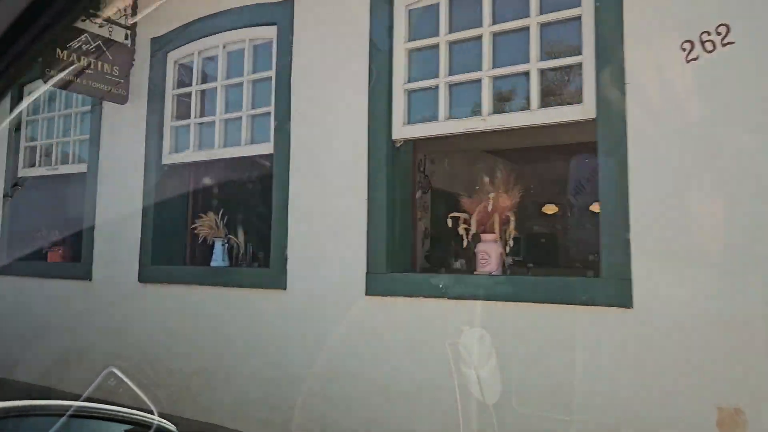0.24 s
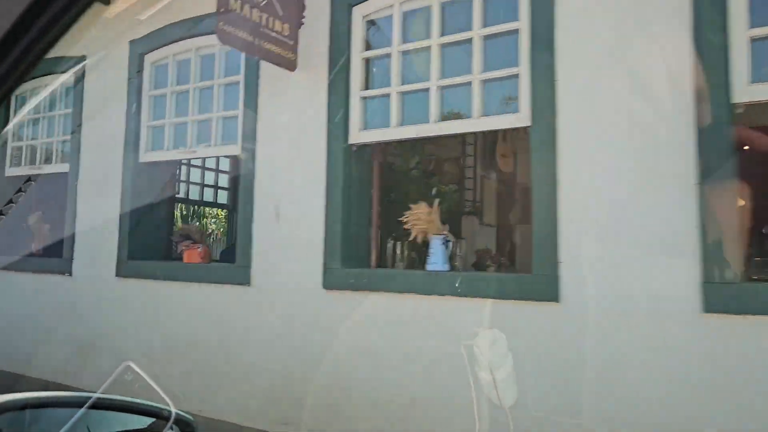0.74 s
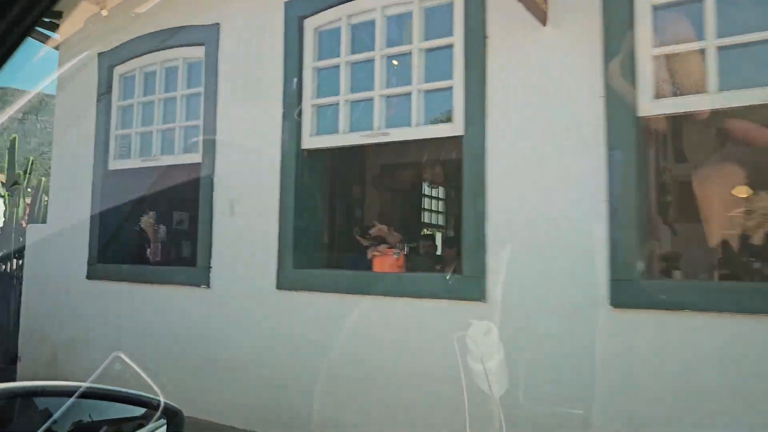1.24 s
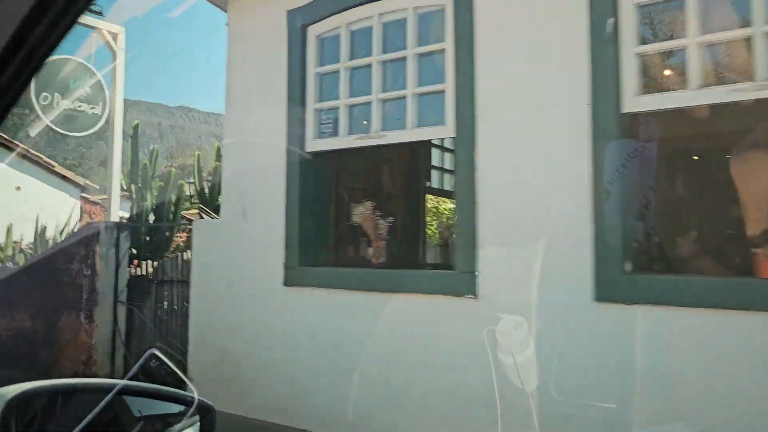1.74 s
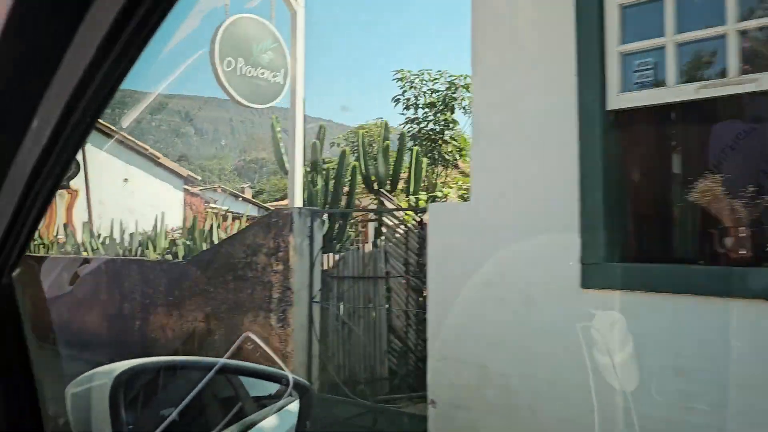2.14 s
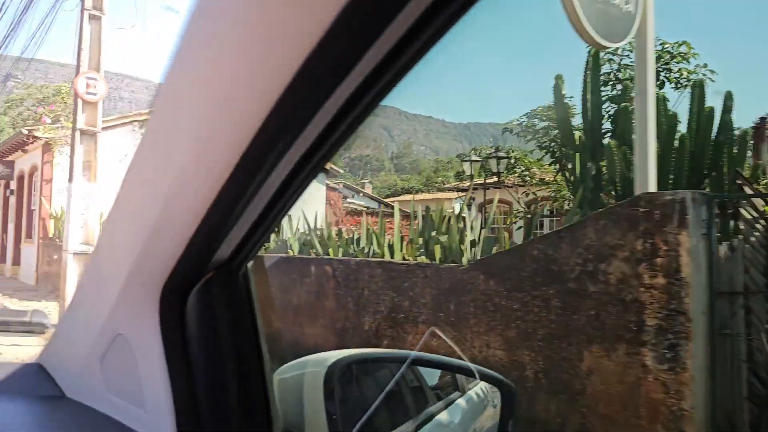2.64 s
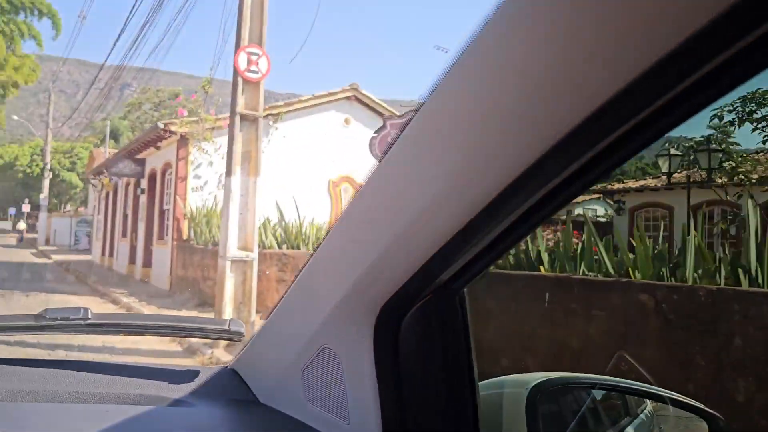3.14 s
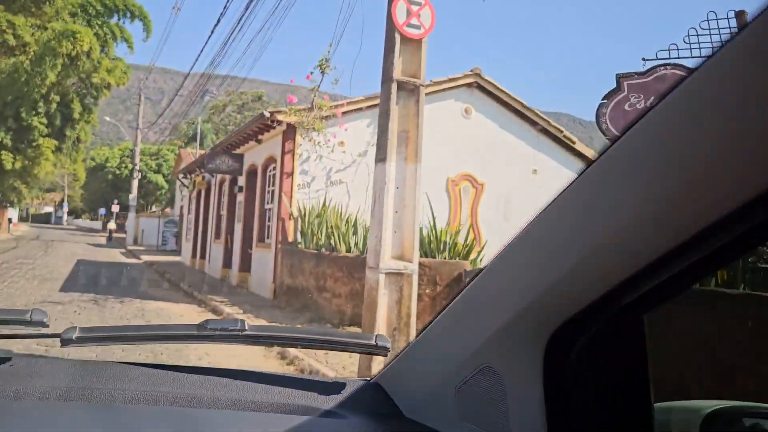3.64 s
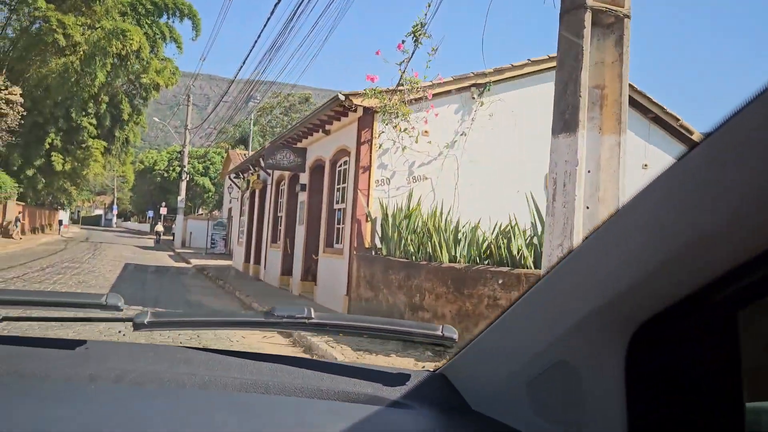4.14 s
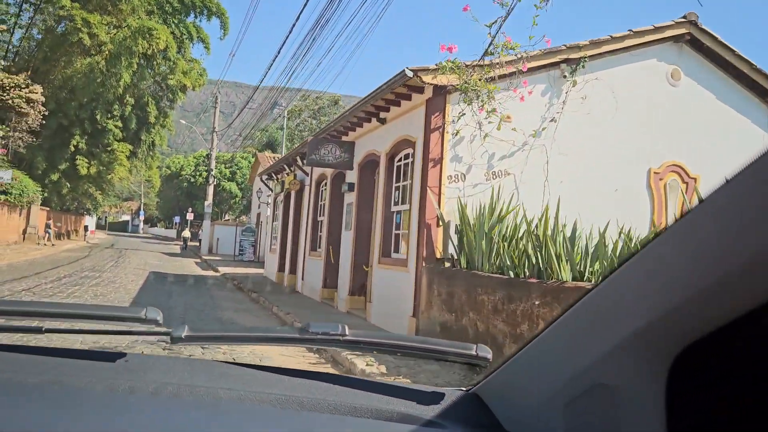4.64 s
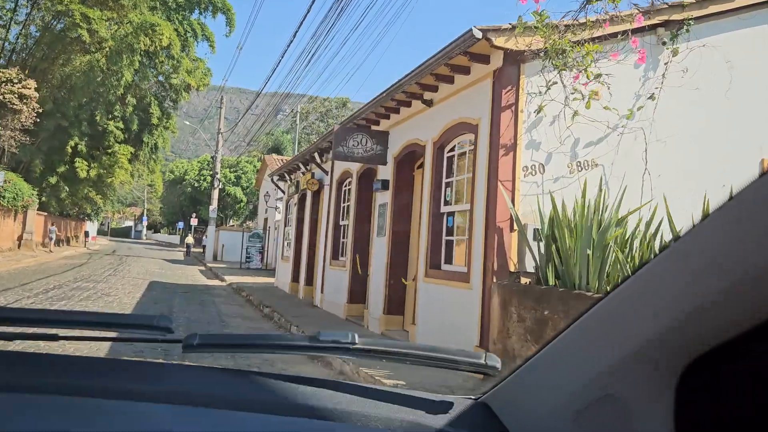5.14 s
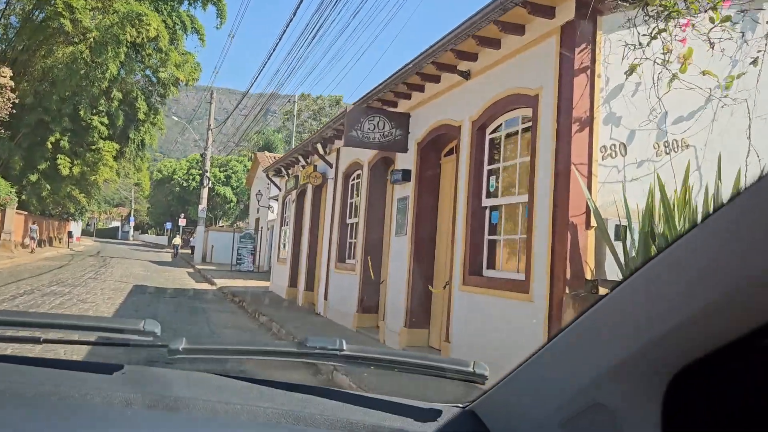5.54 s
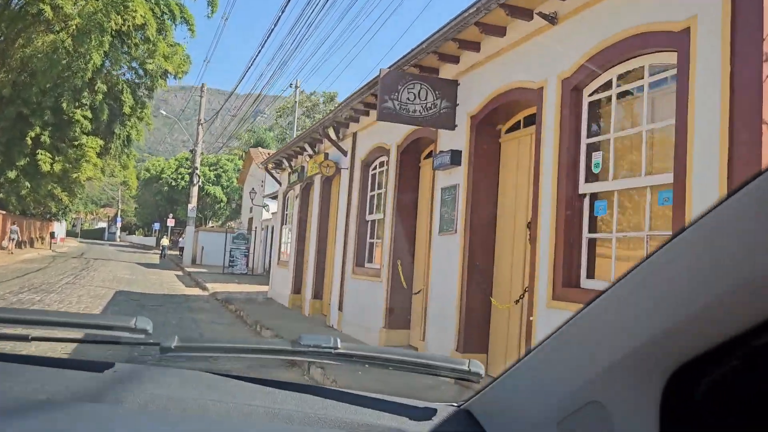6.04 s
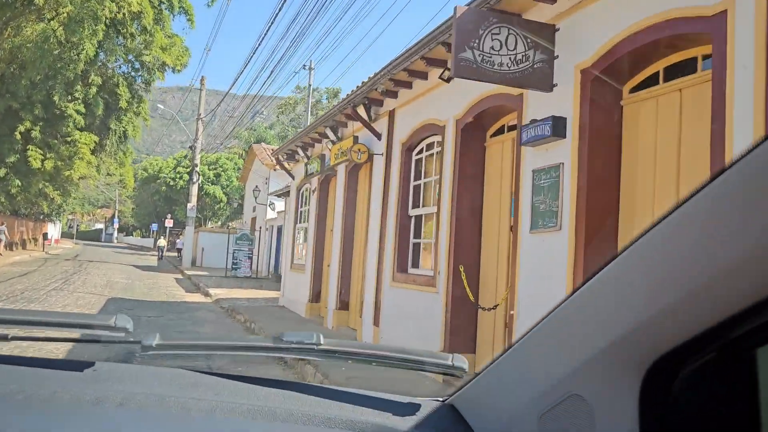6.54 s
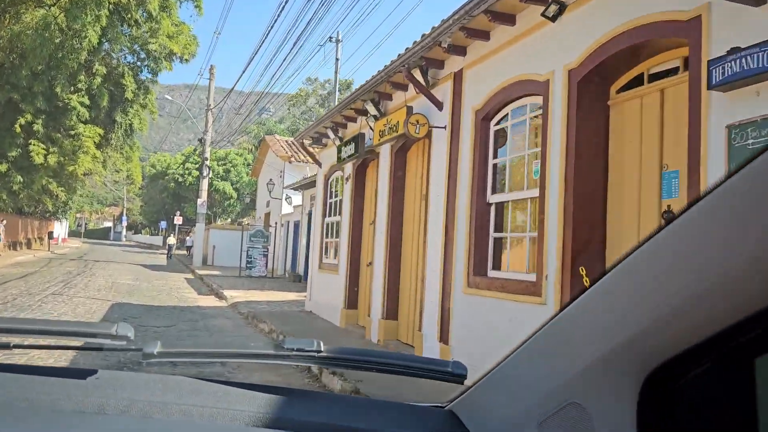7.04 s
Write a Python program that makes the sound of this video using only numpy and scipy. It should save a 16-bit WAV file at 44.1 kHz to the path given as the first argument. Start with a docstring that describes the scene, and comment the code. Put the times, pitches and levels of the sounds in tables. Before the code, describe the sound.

Heard from the front seat with windows shut, a car rolls at walking pace over cobbles. A deep, lumpy rumble and boxy drumming dominate throughout, broken by irregular soft thumps and dull suspension clunks. Above it, loose plastic trim ticks, rubs and knocks in small dry clusters, with rare tiny metal pings. Faint ventilation hiss sits far behind. Bumps crowd together more in the later half.

```python
"""Car on rough cobbles

A car rolls at walking pace over rough cobbles, heard from the front seat with the windows shut.
Random kicks from the stones ring the body, the cabin air and the tyres; scrubbing noise is the tread.
Proud stones thump, and suspension joints clunk. Loose trim ticks, rubs and knocks in noise bursts,
small metal parts ping as dying tones, and filtered noise makes the faint hiss of the ventilation."""
import sys
import numpy as np
from scipy import signal
from scipy.fft import rfft, irfft, next_fast_len
from scipy.io import wavfile
from scipy.ndimage import uniform_filter1d, minimum_filter1d

SR = 44100
rng = np.random.default_rng(int(sys.argv[2]) if len(sys.argv) > 2 else 0)


def int16_out(signal):
    """Quantize to a 16-bit WAV file."""
    q = np.round(np.clip(np.atleast_2d(signal).T, -1, 1) * 32767)
    wavfile.write(sys.argv[1], SR, q.astype(np.int16))


N = 320996
TIME = np.arange(N) / SR


def from_db(db):
    """Turn decibels into a gain."""
    return 10 ** (np.asarray(db) / 20)


def rms_one(x):
    """Scale a sound to an average strength (rms) of 1."""
    return x / np.sqrt(np.mean(x ** 2) + 1e-20)


def in_time(rows):
    """Draw each column of a (time, values) table as a curve over every sample."""
    s, *columns = np.transpose(rows)
    return np.array([np.interp(TIME, s, column) for column in columns])


def at_hz(points, hz):
    """Read a (pitch, value) curve between its points, on a log-frequency axis."""
    point_hz, value = np.transpose(points)
    return np.interp(np.log(hz + 1), np.log(point_hz), value)


def drift(rate):
    """Wander at random between new values, `rate` of them a second, with an rms of 1."""
    knots = rng.standard_normal(int(N / SR * rate) + 3)
    return rms_one(np.interp(TIME * rate, np.arange(len(knots)), knots))


def steady(x, span):
    """Even out the swells that are slower than span seconds."""
    power = np.mean(np.atleast_2d(x) ** 2, axis=0)
    power = uniform_filter1d(power, int(span * SR))
    power = uniform_filter1d(power, int(span * SR / 2))
    return x / np.sqrt(power + 1e-20)


def colour(x, spectrum):
    """Filter to the given spectrum without pre-echo, falling away below its first point."""
    size = next_fast_len(N + SR // 10, True) // 2 * 2
    hz = np.fft.rfftfreq(size, 1 / SR)
    bass_fall = 2 * np.log(np.minimum((hz + 10) / spectrum[0][0], 1))
    log_gain = np.log(from_db(at_hz(spectrum, hz))) + bass_fall
    # folding the cepstrum makes the filter minimum-phase: it answers as early as it can
    cepstrum = irfft(log_gain)
    cepstrum[1:size // 2] *= 2
    cepstrum[size // 2 + 1:] = 0
    return irfft(rfft(x, size) * np.exp(rfft(cepstrum)), size)[..., :N]


def resonate(x, modes):
    """Ring several resonances side by side, with alternating sign."""
    out = 0
    for k, (hz, width, db) in enumerate(modes):
        r = np.exp(-np.pi * width / SR)   # a narrow resonance rings longer
        b = np.array([1, 0, -1]) * (1 - r * r) / 2
        a = [1, -2 * r * np.cos(2 * np.pi * hz / SR), r * r]
        out = out + (-1) ** k * from_db(db) * signal.lfilter(b, a, x + 1e-18)
    return out


def band(x, low_hz, high_hz, order=4):
    """Keep only the sound between two pitches."""
    return signal.sosfilt(signal.butter(order, [low_hz, high_hz], "band", fs=SR, output="sos"), x)


# how alike left and right are, from 1 (the same) through 0 (unrelated) to -1 (opposite)
# columns: pitch_hz, likeness
LEFT_RIGHT_LIKENESS = [(30, .999), (65, .998), (130, .99), (200, .95), (290, .83), (640, .62), (1410, -.08),
                       (3100, .03), (15000, .1)]


def two_ears(a, b):
    """Mix two unrelated signals into cabin stereo: alike in the bass, unrelated in the treble."""
    size = next_fast_len(N, True)
    alike = np.clip(at_hz(LEFT_RIGHT_LIKENESS, np.fft.rfftfreq(size, 1 / SR)), -.999, .999)
    mid = irfft(rfft(a, size) * np.sqrt(1 + alike), size)
    side = irfft(rfft(b, size) * np.sqrt(1 - alike), size)
    return np.array([mid + side, mid - side])[:, :N]


def pan(db):
    """Give the gains that make left louder than right by db."""
    return from_db(np.array([[db], [-db]]) / 2)


def add(out, s, sound):
    """Mix a sound in at s seconds."""
    at = max(int(s * SR), 0)
    out[..., at:at + sound.shape[-1]] += sound[..., :max(N - at, 0)]


def contacts(per_s, spread_db):
    """Scatter random pushes of uneven strength and either direction."""
    hits = rng.random(N) < per_s / SR
    strength = from_db(spread_db * np.clip(rng.standard_normal(N), -2, 2))
    return hits * strength * rng.choice([-1, 1], N)


def left_first_noise(size, direct):
    """Mix unrelated reflections with a direct part that reaches the right side later; rms 1."""
    lag_s = .00047
    shared = rng.standard_normal(size)
    direct_part = direct * np.array([shared, np.roll(shared, int(lag_s * SR))])
    return rms_one(rng.standard_normal((2, size)) + direct_part)


def crackle(per_s):
    """Clump tiny touches, each a short snap with a wisp of cabin echo, at an even strength."""
    touches = contacts(per_s * from_db(3 * drift(25)), spread_db=3.5)
    t = TIME[:SR // 20]
    echo = np.exp(-t / .0012) + .25 * np.exp(-t / .012)
    energy = np.abs(signal.fftconvolve(touches ** 2, echo ** 2)[:N])
    return steady(np.sqrt(energy) * left_first_noise(N, direct=.6), span=.06)


# colour of the air hiss; columns: pitch_hz, relative_db (per Hz)
VENT_SPECTRUM = [(500, -3.5), (1300, 5.5), (1750, -2.5), (2300, 4), (3100, -2), (3600, -2), (4600, -2.5),
                 (5500, -7.5), (6600, -13.5), (7500, -15), (9000, -13.5), (10500, -28.5), (15000, -23)]
# air whistling past the vent slats; columns: pitch_hz, width_hz, relative_db
SLAT_WHISTLES = [(4908, 28, -1), (3020, 160, -5), (7400, 240, -14)]


def ventilation():
    """Hiss smoothly as air leaves the vents; faint slat whistles come and go, each on its own."""
    hiss = rms_one(colour(two_ears(*rng.standard_normal((2, N))), VENT_SPECTRUM))
    whistles = 0
    for mode in SLAT_WHISTLES:
        flutter_db = 2.8 * np.minimum(drift(12), 1)
        whistles = whistles + resonate(rng.standard_normal((2, N)), [mode]) * from_db(flutter_db)
    whistles = rms_one(band(whistles, 2000, 9800))
    return (from_db(-65) * hiss + from_db(-72) * whistles) * pan(-9.0)


# small metal parts ping; columns: start_s, level_db, pitch_hz, fade_s (time to fall by 60 dB)
METAL_PINGS = [(0.193, -56, 7200, 0.13), (0.196, -63, 7540, 0.79), (0.585, -62.5, 3710, 0.75),
               (1.346, -67, 7500, 0.4), (2.080, -68, 11750, 0.12), (2.334, -49, 4330, 0.035),
               (2.514, -49, 4330, 0.027), (2.958, -70, 12100, 0.13), (3.251, -54, 4380, .04),
               (5.108, -67.5, 7560, 0.25)]


def metal_pings():
    """Ring thin metal as dying tones, made rough by buzzing against its mount."""
    out, t = np.zeros(N), TIME[:SR // 2]
    for s, db, hz, fade_s in METAL_PINGS:
        # higher modes are disturbed more by the buzzing contact
        wobble = 1.6 * (hz / 7400) ** 2 * drift(550)[:len(t)]
        add(out, s, from_db(db - 60 * t / fade_s) * np.sin(2 * np.pi * hz * t + wobble))
    return out


def seal_squeak():
    """Slide one short tone upward, as a rubbing seal squeaks."""
    start_s, length_s, level_db = 4.95, .06, -65.5
    out = np.zeros(N)
    hz = np.linspace(4830, 5320, int(length_s * SR))
    tone = np.sin(2 * np.pi * np.cumsum(hz) / SR)
    add(out, start_s, from_db(level_db) * signal.windows.tukey(len(hz), .8) * tone)
    return out


# loudness of a faint whistle, silent outside these times; columns: time_s, level_db
FAINT_WHISTLE = [(.94, -79), (1.0, -76), (1.09, -69), (1.18, -65.5), (1.26, -71), (1.3, -80), (1.35, -71),
                 (1.41, -72), (1.49, -65.5), (1.55, -70), (1.7, -74.5), (1.82, -93)]


def faint_whistle():
    """Hold one pitch while its loudness rises and falls."""
    level_db = np.interp(TIME, *np.transpose(FAINT_WHISTLE), left=-np.inf, right=-np.inf)
    return from_db(level_db) * np.sin(2 * np.pi * 2003 * TIME)


def pings_and_squeaks():
    """Let the strength of all the thin tones waver, separately on the left and right."""
    waver = 1 + 0.18 * np.array([drift(150), drift(150)])
    return (metal_pings() + seal_squeak() + faint_whistle()) * waver * pan(-2.5)


# panels knock in their clips; columns: start_s, relative_db, pitch_hz
PANEL_KNOCKS = [(0.479, -53.5, 1306), (0.533, -57.5, 1336), (0.722, -58, 1330), (0.796, -51, 1035),
                (0.801, -58, 2100), (0.957, -50, 1320), (0.959, -55, 2270), (1.322, -60, 1310),
                (1.502, -56, 1376), (2.265, -56, 1137), (2.372, -56, 850), (2.374, -60, 1310),
                (2.593, -63, 2120), (2.603, -59, 1340), (2.74, -63, 1440), (2.856, -55.5, 1250),
                (2.854, -55, 2210), (2.886, -58.5, 2140), (2.949, -63, 2230), (3.046, -53.5, 940),
                (3.043, -62, 2220), (3.113, -57.5, 2160), (3.276, -55, 920), (3.506, -61, 1120),
                (3.766, -59, 814), (4.112, -51.5, 777), (4.591, -67, 800), (4.928, -48, 797),
                (4.929, -54, 990), (5.052, -54.5, 818), (5.460, -53, 782), (6.218, -51.5, 984),
                (6.314, -58, 2180), (6.84, -56, 910), (7.170, -58, 1040)]
# ways a panel rings; columns: times_its_pitch, relative_db
PANEL_RINGS = [(1, 0), (1.09, -6), (1.72, -14), (1.95, -17)]


def knocks():
    """Ring a softly bumped panel at its hollow pitch, with a little noisy chatter as it dies."""
    out, t = np.zeros((2, N)), TIME[:SR // 8]
    onset = 1 - np.exp(-t / .0015)
    for s, db, hz in PANEL_KNOCKS:
        ring = 0
        for ratio, mode_db in PANEL_RINGS:
            phase = rng.normal(0, 0.11, (2, 1))   # slightly different left and right
            ring = ring + from_db(mode_db) * np.sin(2 * np.pi * hz * ratio * t + phase)
        buzz = 0.41 * rms_one(band(rng.standard_normal((2, len(t))), hz * .7, hz * 1.5, order=2))
        fade_s = 0.06 * np.sqrt(1200 / hz)   # time to fall by 60 dB: higher knocks die sooner
        add(out, s, from_db(db + 8.5 - 60 * t / fade_s) * onset * (ring + buzz))
    return out


# colour of the creaking trim; columns: pitch_hz, relative_db (per Hz)
CREAK_SPECTRUM = [(700, -10), (1350, -3.5), (1750, 4), (2300, 3.5), (3000, 0), (3600, -3.5), (5000, -4),
                  (6500, -9), (8200, -7), (10300, -19.5), (12300, -11.5), (15000, -19.5)]
# trim rubs and rattles for a moment; columns: middle_s, length_s, level_db, centre_hz
TRIM_RUBS = [(0.033, 0.019, -49, 2800), (0.241, 0.08, -60, 5500), (0.544, 0.023, -61, 2200),
             (0.764, 0.084, -58, 4000), (0.807, 0.051, -62, 3500), (1.49, 0.25, -64.5, 4150),
             (1.903, 0.068, -58, 5500), (2.037, 0.042, -56, 3800), (2.375, 0.044, -61, 3820),
             (2.666, 0.037, -59.5, 4800), (2.87, 0.11, -66, 2300), (3.21, 0.029, -63, 5000),
             (3.258, 0.084, -59, 4500), (3.687, .05, -64, 5000), (3.967, 0.083, -60, 5400),
             (4.107, 0.055, -62, 4500), (4.418, 0.065, -58, 4400), (5.285, 0.098, -65, 5030),
             (5.672, 0.075, -61, 2400), (5.78, 0.088, -62, 5150), (5.959, 0.04, -58.5, 4200),
             (6.063, 0.29, -63.5, 2720), (6.07, 0.089, -61.5, 3570), (6.22, 0.14, -63.5, 2300),
             (6.574, 0.049, -64, 4500), (6.72, 0.19, -62, 3970)]


def trim_rubs():
    """Thicken the crackle into a short rattle where two panels rub."""
    out = np.zeros((2, N))
    slips = colour(crackle(per_s=430), CREAK_SPECTRUM)
    for s, length, db, hz in TRIM_RUBS:
        window = np.sqrt(np.hanning(int(length * SR)))
        at = max(int((s - length / 2) * SR), 0)
        rub = rms_one(band(slips[:, at:at + len(window)], hz / 1.4, hz * 1.6, order=2))
        add(out, s - length / 2, from_db(db) * window * rub)
    return out * pan(-7.0)


# colour of the snapping trim; columns: pitch_hz, relative_db (per Hz)
TRIM_SPECTRUM = [(500, -17.5), (1200, 1), (1900, -4.5), (2900, 4.5), (3500, 1.5), (5200, 7), (6800, 0.5),
                 (8400, 1), (9600, -11.5), (10900, -18.5), (16000, -35)]


def trim_shiver(roar_db):
    """Crackle finely in the door trim, with soft stray ticks, livelier where the road roars more."""
    shake = from_db(0.98 * uniform_filter1d(roar_db - np.median(roar_db), SR // 10))
    fine = rms_one(colour(crackle(per_s=330), CREAK_SPECTRUM))
    fine = from_db(-67) * shake * fine * pan(0.5)
    strays = contacts(per_s=16 * shake, spread_db=2)
    t = TIME[:SR // 30]
    snap = np.exp(-t / .003) * (1 - np.exp(-t / .0008))
    rattle = np.abs(signal.fftconvolve(np.abs(strays), snap)[:N]) * left_first_noise(N, direct=0.3)
    rattle = band(colour(rattle, TRIM_SPECTRUM), 1500, 9000, order=2)
    return fine + from_db(-58) * rattle * pan(-2.5)


# loose trim ticks; columns: start_s, relative_db, left_minus_right_db, sparkle_db (relative)
TRIM_TICKS = [(0.0347, -36.5, -7, -33), (0.0735, -44, -1, -43), (0.1587, -44, -5, -43),
              (0.2326, -40, -1, -27), (0.269, -40.5, -4, -34), (0.392, -46.5, -3.5, -40),
              (.596, -46, -2, -23), (.619, -51, -2, -32), (.68, -51, -5, -38), (0.7297, -46, -1, -24),
              (0.7477, -38.5, 0, -15), (0.7644, -37, 0, -24), (0.7973, -35.5, -2.0, -24),
              (1.196, -44.5, 1, -32), (1.45, -44.5, 0, -32), (1.479, -47, -3.0, -27),
              (1.5075, -40.5, -1.5, -30), (1.5429, -50, -2.0, -35), (1.6062, -51, 7, -32),
              (1.6871, -43, 1, -38), (1.7794, -45.5, 1, -20), (1.793, -47, -2, -15), (1.823, -48, 2, -16),
              (1.857, -53, -1, -30), (1.881, -45, -1, -26), (1.9031, -38, -1, -13), (1.941, -47, 0, -32),
              (1.9784, -42, -4, -31), (2.0365, -48, -3, -27), (2.0534, -42, 1, -16), (2.2623, -41, -3, -17),
              (2.306, -49, -5, -28), (2.3332, -41, -5, -10), (2.3705, -51, 0, -25), (2.385, -43.5, -5, -13),
              (2.4708, -47, -7, -32), (2.4922, -41, -7.5, -37), (2.5127, -44, -7, -17),
              (2.6482, -44, -6, -28), (2.657, -41, -5, -30), (2.6725, -43, -5, -38),
              (2.8499, -46.5, -4.5, -14), (2.9126, -47.5, -3, -22), (3.0674, -50, -5.5, -18),
              (3.094, -46, -6.5, -33), (3.1857, -46.5, -10, -29), (3.2, -49, -5, -28),
              (3.227, -46, -3.0, -15), (3.249, -42.5, -6, -8), (3.2997, -40, -5, -24),
              (3.3154, -42, -4, -15), (3.335, -41, -2, -21), (3.363, -47, -2, -25),
              (3.696, -45.5, -6.0, -33), (3.7219, -45, -4, -28), (3.785, -49, -8, -15),
              (3.831, -54, -2, -33), (3.9469, -52, -2, -22), (3.9624, -41, -3, -16), (4.045, -52, -5, -29),
              (4.0784, -41, -3, -19), (4.1004, -52, -4, -27), (4.1335, -49, -4, -25),
              (4.4089, -50, -4, -25), (4.427, -53, -2, -32), (4.4508, -43.5, -3, -33),
              (4.4805, -46, -2, -29), (4.5146, -44, -4, -26), (4.5517, -43, 0, -21), (4.581, -47, -6, -29),
              (4.5974, -49, -7, -18), (4.6844, -40.5, -4, -34), (4.709, -51, -7, -31),
              (4.8219, -43, -2, -33), (4.8826, -42.5, -3.0, -31), (4.915, -44.5, -6, -28),
              (5.2418, -46, -4.5, -22), (5.284, -43, -3, -22), (5.3066, -44.5, -13, -31),
              (5.544, -50.5, -7, -18), (5.6555, -49, -3, -35), (5.7352, -39.5, -6, -21),
              (5.746, -47, -4, -28), (5.784, -50, -8, -29), (5.805, -45, -3, -16), (5.943, -41.5, -5, -18),
              (6.0212, -41.5, -8.5, -20), (6.0874, -49, -7, -24), (6.112, -46, -4, -26),
              (6.154, -47, -11, -22), (6.1775, -39.5, -5, -25), (6.2318, -37.5, -4, -19),
              (6.2716, -51, -6, -26), (6.34, -57, -8, -34), (6.4802, -43, -7, -34),
              (6.5098, -45, -7.5, -33), (6.54, -55, -8, -32), (6.6077, -38.5, -5.5, -26),
              (6.6308, -47, -10, -29), (6.69, -44, -5.5, -27), (6.7103, -38, -4, -21),
              (6.7345, -39, -4, -10), (6.768, -50, -5.0, -29), (6.79, -47.5, -7, -29),
              (7.0367, -49, -6, -29), (7.059, -49, -5, -23.5), (7.19, -49, -4, -31), (7.206, -49, -4, -32)]
# colour of the top sparkle; columns: pitch_hz, relative_db (per Hz)
SPARKLE_SPECTRUM = [(9500, -33.5), (11000, -19.5), (12200, 1), (13200, -5.5), (14200, -12.5), (16000, -24)]


def trim_ticks():
    """Snap plastic edges in brief noise, with a top sparkle and an answer from the small cabin."""
    snaps, sparkles, t = np.zeros((2, N)), np.zeros((2, N)), TIME[:SR // 8]
    onset = 1 - np.exp(-t / .002)
    # each fade time is the time to fall by 60 dB
    cabin = from_db(-19 - 60 * t / .085)
    crack = (from_db(-60 * t / .014) + cabin) * onset
    shine = (from_db(-60 * t / .026) + cabin) * onset
    for s, db, side_db, top_db in TRIM_TICKS:
        chatter = from_db(db + 3) * pan(side_db) * left_first_noise(len(t), direct=0.2)
        # every piece has a resonance of its own
        piece = resonate(crack * chatter, [(rng.uniform(2200, 7500), 900, 0)])
        snap = from_db(-2.5) * (crack * chatter + piece)
        add(snaps, s, snap)
        # the loose piece touches once more
        add(snaps, s + rng.uniform(.006, .022), from_db(-10) * snap)
        add(sparkles, s, from_db(top_db + 10) * shine * chatter)
    return colour(snaps, TRIM_SPECTRUM) + colour(sparkles, SPARKLE_SPECTRUM)


# a suspension joint clunks on a hard stone; columns: start_s, relative_db, centre_hz
JOINT_CLUNKS = [(0.087, -30.5, 354), (0.715, -35, 344), (1.142, -39.5, 358), (2.286, -38, 363),
                (2.337, -34.5, 348), (2.883, -40, 400), (2.952, -37, 340), (3.042, -35, 327),
                (3.762, -36, 357), (3.89, -37, 353), (4.375, -40, 380), (4.556, -30.5, 360),
                (4.72, -37.5, 403), (4.943, -39.5, 400), (5.088, -36, 380), (5.949, -34, 364),
                (6.103, -36.5, 366), (7.042, -41, 342)]


def clunks():
    """Make a short, dull clunk of narrow noise as a rubber bush takes up its play."""
    out, t = np.zeros(N), TIME[:SR // 8]
    onset = 1 - np.exp(-t / .002)
    fade_s = 0.083   # time to fall by 60 dB
    for s, db, hz in JOINT_CLUNKS:
        ring = rms_one(band(rng.standard_normal(len(t)), hz / 1.1, hz * 1.1, order=2))
        add(out, s, from_db(db + 1.5 - 60 * t / fade_s) * onset * ring)
    return out


# a tyre drops off a proud stone; columns: start_s, cabin_thud_peak_db, tyre_ring_peak_db
STONE_BUMPS = [(.086, -12, -19.5), (.376, -24, -28), (0.443, -19, -33), (.495, -17.5, -33),
               (0.538, -34, -29.5), (.629, -24, -31), (.659, -24, -24), (0.695, -17, -36),
               (0.726, -22.5, -27.5), (0.777, -34, -28), (0.907, -26, -29.5), (.952, -16.5, -44),
               (1.098, -19.5, -24.5), (1.261, -15.5, -35), (1.296, -26, -23), (1.321, -32, -24.5),
               (1.481, -19.5, -44), (2.035, -25, -27.5), (2.105, -12, -38), (2.333, -18, -28),
               (2.353, -29, -28), (2.476, -21.5, -33), (2.626, -16.5, -33), (2.781, -19, -45),
               (2.826, -17, -40), (2.909, -14, -27), (2.952, -13, -29), (2.984, -29, -27),
               (3.009, -33, -24), (3.055, -18.5, -18.5), (3.132, -28.5, -23.5), (3.197, -26.5, -25.5),
               (3.227, -25.5, -23), (3.388, -20, -35), (3.42, -18.5, -39.5), (3.496, -20.5, -28.5),
               (3.848, -14, -34), (3.888, -27, -29), (3.935, -26.5, -32.5), (3.995, -18.5, -45),
               (4.102, -17, -35), (4.469, -31, -26.5), (4.536, -16, -28), (4.555, -13, -44),
               (4.594, -15, -34), (4.673, -27, -30), (4.854, -21, -34), (4.930, -10, -16.5),
               (4.973, -20, -18), (5.022, -14, -31.5), (5.242, -13, -29), (5.279, -14, -30),
               (5.333, -24, -26.5), (5.422, -17, -23), (5.462, -33, -29), (5.491, -23, -28.5),
               (5.755, -16, -21), (5.79, -19.5, -28), (5.945, -14.5, -31), (5.988, -15, -21.5),
               (6.1, -19, -41), (6.146, -22, -26), (6.177, -19, -17), (6.218, -12.5, -17.5),
               (6.257, -19, -18), (6.331, -21.5, -22), (6.372, -15.5, -20.5), (6.418, -25, -30.5),
               (6.601, -24.5, -21), (6.72, -23, -34), (7.001, -17, -23), (7.046, -12.5, -24),
               (7.083, -31, -24.5)]
# cabin resonances, before a random shift; columns: pitch_hz, width_hz, relative_db
CABIN_THUD = [(87.7, 15, -1), (121.6, 24.3, 0.5), (148.9, 21.4, -1.5)]
# tyre resonances, before a random shift; columns: pitch_hz, width_hz, relative_db
TYRE_RING = [(191.7, 23.2, -1), (231.4, 23, -1), (287, 28, -22), (338, 64, -32), (530, 28, -32.5),
             (830, 16, -28.5)]


def soft_push(soft_hz):
    """Round off one sharp push, as rubber or a spring does; a lower soft_hz is softer."""
    smooth = signal.butter(3, soft_hz, fs=SR, output="sos")
    return signal.sosfilt(smooth, signal.unit_impulse(SR // 3))


def bumps():
    """Push once per proud stone: the tyre rings and the cabin thuds through the softer springs."""
    out = np.zeros(N)
    through_springs, through_rubber = soft_push(190), soft_push(480)
    for s, cabin_db, tyre_db in STONE_BUMPS:
        parts = ((through_springs, cabin_db, CABIN_THUD), (through_rubber, tyre_db, TYRE_RING))
        for push, db, modes in parts:
            # the load shifts the resonances a little each time
            loaded = [(hz * (1 + rng.normal(0, .025)), width, mode_db + rng.normal(0, 1.5))
                      for hz, width, mode_db in modes]
            thump = resonate(push, loaded)
            add(out, s, from_db(db) * thump / np.abs(thump).max())
    return out


def level_changes(rows, ease_in_s, ease_out_s):
    """Make each (start, length, dB, ..) row ease in, hold and ease out; one dB curve per column."""
    total = 0
    for s, length, *db in rows:
        corners_s = [s - ease_in_s, s, s + length, s + length + ease_out_s]
        total = total + np.outer(db, np.interp(TIME, corners_s, [0, 1, 1, 0]))
    return total


# swaying of the body on its springs; columns: time_s, relative_db
BODY_RIDE = [(0, -18.5), (.4, -18), (1.7, -17), (3.2, -19.5), (4.1, -17.5), (6.2, -19), (6.7, -16),
             (7.2, -16)]
# the low sway swells or sinks for a moment; columns: start_s, length_s, sway_change_db
SWAY_CHANGES = [(.1, 0.1, 1), (.36, 0.15, 3.5), (1.33, 0.074, 1.5), (1.87, 0.27, 2), (2.26, 0.36, 4.5),
                (2.82, 0.083, 4), (3.02, 0.038, 2), (3.22, .12, 2.5), (3.44, 0.25, 3.5), (3.69, 0.093, 4),
                (4.32, 0.091, 1), (5.29, 0.045, 2), (5.66, 0.036, 5), (7.06, 0.1, -1.5)]
# ordinary paving; columns: time_s, drumming_db, tyre_boom_db, tread_roar_db (all relative)
ORDINARY_PAVING = [(0, -24.5, -41, -48.5), (.4, -29.5, -38.5, -56), (1.0, -26, -36.5, -52.5),
                   (1.6, -25.5, -42, -50.5), (1.9, -29.5, -37, -51.5), (2.25, -26, -38, -50.5),
                   (2.6, -25, -36.5, -50.5), (3.0, -24, -40, -51), (3.6, -25, -40.5, -49),
                   (4.2, -25, -40.5, -50.5), (4.75, -25, -38.5, -50.5), (5.15, -25.5, -39.5, -52.5),
                   (5.65, -31, -42.5, -51.5), (6.1, -22, -33.5, -48), (6.5, -25.5, -40, -50),
                   (7.2, -29, -43.5, -51.5)]
# the tyre noise changes level for a moment
# columns: start_s, length_s, drumming_change_db, boom_change_db, roar_change_db
TYRE_CHANGES = [(.088, .043, 4, 10, 2), (.46, 0.11, -2, 3, 3.5), (.7, 0.079, -0.5, 4, 1.5),
                (1.26, .082, -2, 5, 0), (2.32, .056, -2.5, 5, 3), (2.63, 0.032, -4.5, 1.5, 1),
                (2.89, 0.25, -0.5, 9, 2), (3.2, .057, 0, 4, 4), (3.87, 0.098, 1, 4.5, 1),
                (4.04, 0.06, -1.5, -5, 2.5), (4.55, 0.082, -1.5, 7, 1.5), (4.71, 0.022, 0, 0, 3.5),
                (4.93, 0.13, 1, 9, 3.5), (5.27, 0.085, 2.5, 6, 3), (5.43, 0.081, -2.5, 9, 1.5),
                (5.95, .1, 1, 9.5, 2), (6.17, 0.14, -3, -3.5, -0.5), (6.6, .08, 2, 10.5, .5),
                (7.02, .063, 0.5, 7, 2.5)]
# brief changes of level in all four; columns: start_s, length_s, then the changes
# sway_change_db, drumming_change_db, boom_change_db, roar_change_db
BRIEF_LEVEL_CHANGES = [(.22, 0.016, -9, 5, 2, -4), (.3, 0.011, 3.5, 4, 1.5, 5.5),
                       (.85, 0.049, -5.5, -1.5, 1.5, 0.5), (1.49, 0.036, -0.5, -7, 4, -2),
                       (1.72, 0.12, -3.5, -0.5, 0.5, -0.5), (2.42, 0.028, -4.5, -0.5, 4, -1.8),
                       (2.55, 0.029, -3.5, -11, 0, -0.8), (2.69, 0.039, -3.5, 0, 4, 1.9),
                       (3.13, 0.026, 0, -3, -1, -1), (3.615, 0.032, -2.5, 0.5, 2, -0.5),
                       (3.91, 0.054, -7, 0.5, 2, 2.3), (4.17, 0.011, -8, -4, -2, -3.5),
                       (4.49, 0.034, -3, 1, -15, -3.5), (4.75, 0.027, -3.5, 1, 0, -3.5),
                       (5.1, 0.088, 0, -4, -2, -0.8), (5.5, 0.14, -2.5, 5, -4.5, -2),
                       (5.82, 0.036, -6.5, -2, 6, -0.5), (6.24, 0.021, -5.5, 2.5, 2, 2),
                       (6.49, 0.078, -0.5, -5, 1, -1.8), (6.93, 0.096, -3, -3.5, -1, -0.5)]


def road_levels():
    """Set sway, drumming, boom and roar in dB: slow curves plus momentary changes of level."""
    sway = in_time(BODY_RIDE) + level_changes(SWAY_CHANGES, ease_in_s=0.035, ease_out_s=0.046)
    # each change eases in, holds, then falls back more quickly
    tyres = in_time(ORDINARY_PAVING) + level_changes(TYRE_CHANGES, ease_in_s=0.064, ease_out_s=0.021)
    brief = level_changes(BRIEF_LEVEL_CHANGES, ease_in_s=0.02, ease_out_s=0.02)
    return np.vstack([sway, tyres]) + brief


LUMPS_PER_S = 18   # how often the random unevenness of the stones takes a new value
# colour of the tread roar; columns: pitch_hz, relative_db (per Hz)
ROAR_SPECTRUM = [(200, -5.5), (290, 0.6), (360, 0.46), (485, -6.5), (535, -3), (620, -9.5), (760, -10),
                 (790, -8.5), (820, -12), (920, -13), (1100, -17.5), (1400, -18), (1800, -29.5),
                 (4000, -58.5)]


def tread(roar_db):
    """Slap and scrub tread blocks on the stones, in a flutter of short bursts."""
    scrub = [rms_one(contacts(per_s=900, spread_db=-0.5)) + 0.75 * rng.standard_normal(N)
             for _ in range(2)]
    flutter_db = 1.6 * drift(55) + 1.2 * drift(LUMPS_PER_S)
    roar = colour(two_ears(*scrub), ROAR_SPECTRUM) * from_db(flutter_db)
    return from_db(roar_db + 1.2) * steady(roar, span=0.41)


# body on its springs; columns: pitch_hz, width_hz, relative_db
BODY_RESONANCES = [(26.83, 5.78, 3.5), (35, 12.4, -0.5), (57.1, 14.1, -3.5)]
# air in the cabin; columns: pitch_hz, width_hz, relative_db
CABIN_RESONANCES = [(57, 15.1, -10.5), (87.8, 9.5, 3), (115.4, 15, 1), (129, 25.4, -2), (162.5, 24, -8.5)]
# air in the tyres; columns: pitch_hz, width_hz, relative_db
TYRE_RESONANCES = [(196, 14, -0.5), (224.2, 14.5, -2), (243.3, 30, -5)]


def cobbles(sway_db, drum_db, boom_db):
    """Kick the tyres with stone edges; the kicks ring the body, the cabin air and the air in the tyres."""
    kicks = two_ears(*[rms_one(contacts(per_s=140, spread_db=3.5)) for _ in range(2)])
    kicks = np.hstack([kicks[:, -SR // 2:], kicks])   # the car is already rolling
    sway = band(resonate(kicks, BODY_RESONANCES), 21.36, 70.2)[:, -N:]
    drum = band(resonate(kicks, CABIN_RESONANCES), 64.2, 165.3)[:, -N:]
    boom = band(resonate(kicks, TYRE_RESONANCES), 147.6, 293.5)[:, -N:]
    # no two stones are alike; the dampers cap the largest swings
    stones = drift(LUMPS_PER_S)
    sway_lumps_db = 1.0 * np.minimum(drift(LUMPS_PER_S), 1)
    sway = from_db(sway_db - 1.25 + sway_lumps_db) * steady(sway, span=0.065)
    drum = from_db(drum_db - 0.56 + 1.87 * stones) * steady(drum, span=0.063)
    boom = from_db(boom_db - 5.0 + 3 * stones) * steady(boom, span=0.078)
    # the deepest rumble reaches the right side first
    sway = np.array([np.interp(TIME - .0003, TIME, sway[0]), sway[1]])
    return (sway + drum + boom) * pan(0.22)


def scene():
    """Add the small sounds of the cabin to the road noise that comes through the body."""
    sway_db, drum_db, boom_db, roar_db = road_levels()
    trim = trim_ticks() + trim_shiver(roar_db) + trim_rubs() + knocks() + pings_and_squeaks()
    road = cobbles(sway_db, drum_db, boom_db) + tread(roar_db) + bumps() + clunks()
    return ventilation() + trim + road


def record(dry):
    """Open without a click, hold down the largest swings with a limiter and cut the top."""
    fade_s, ceiling, hold_s = .012, .42, .03
    allowed = np.minimum(ceiling / (np.abs(dry).max(axis=0) + 1e-9), 1)
    gain = minimum_filter1d(allowed, int(hold_s * SR))
    for _ in range(2):   # smooth the gain so that it moves gently
        gain = uniform_filter1d(gain, int(hold_s * SR / 2))
    gain = gain * np.minimum(TIME / fade_s, 1)
    top_cut = signal.cheby2(14, 70, 16400, fs=SR, output="sos")   # 70 dB down from 16400 Hz up
    return signal.sosfilt(top_cut, dry * gain)


dry = scene()
out = record(dry)
int16_out(out)
```